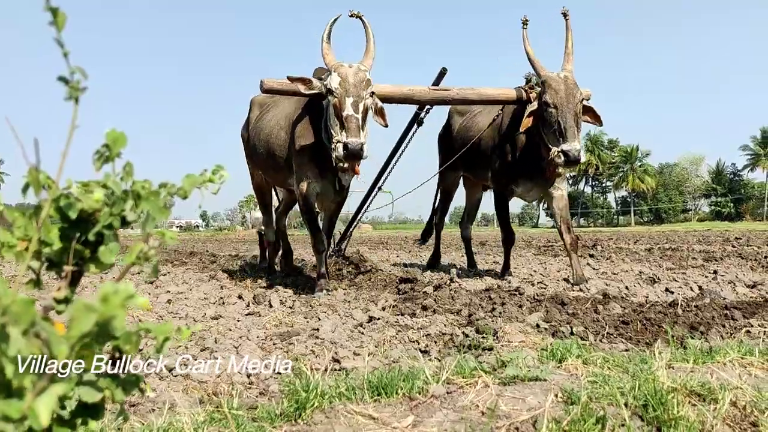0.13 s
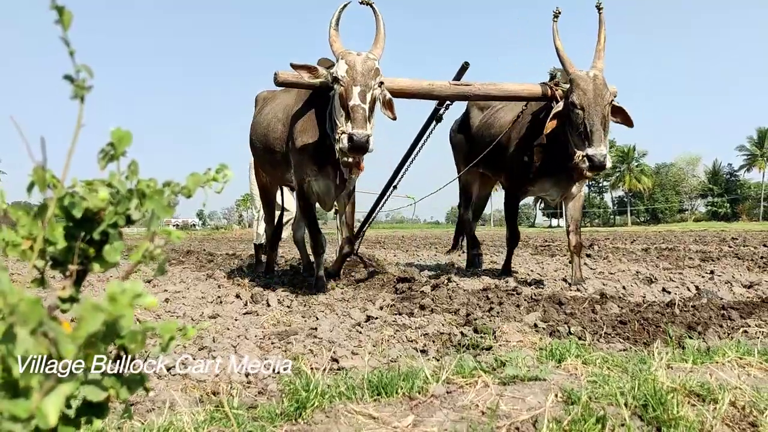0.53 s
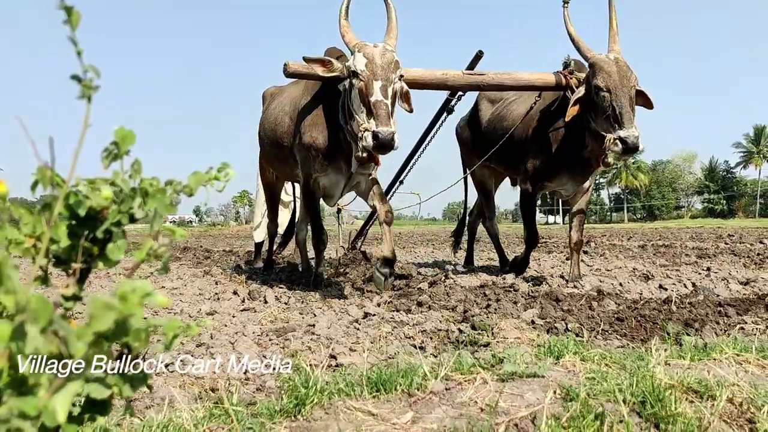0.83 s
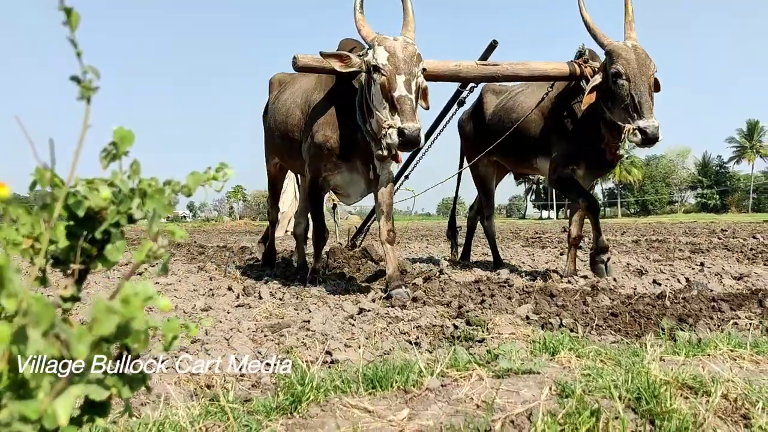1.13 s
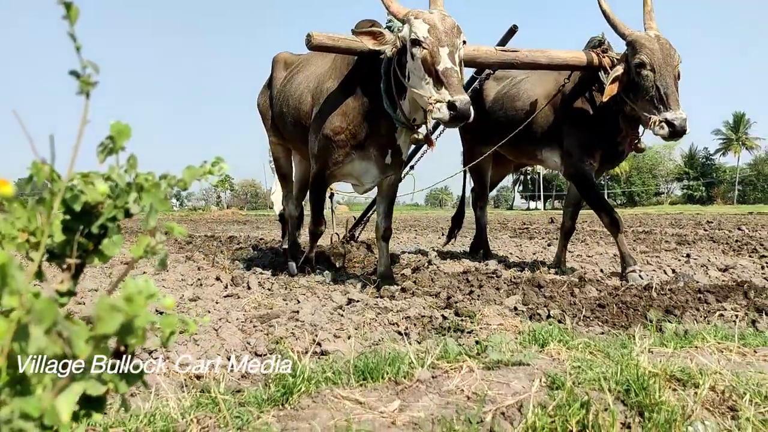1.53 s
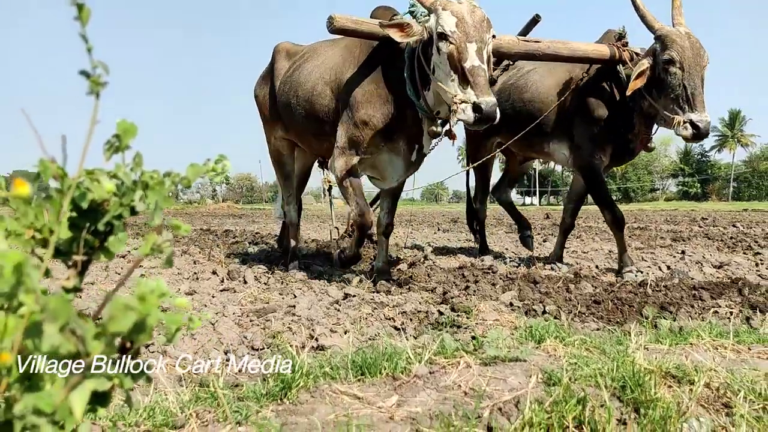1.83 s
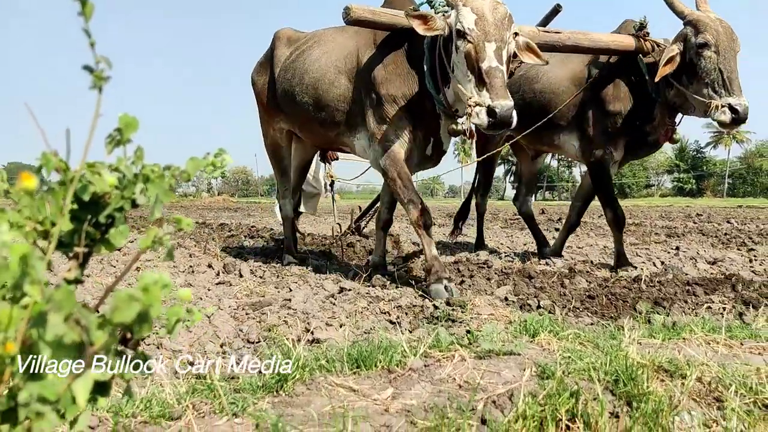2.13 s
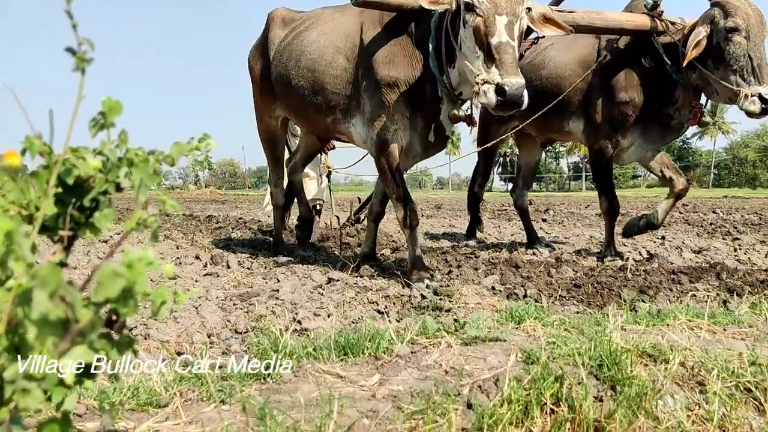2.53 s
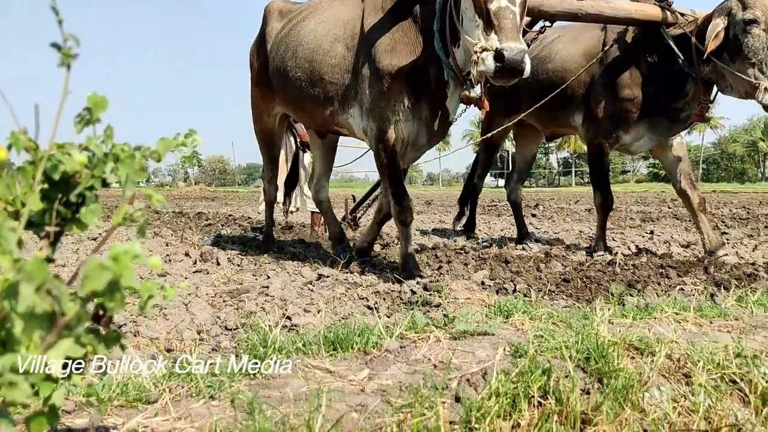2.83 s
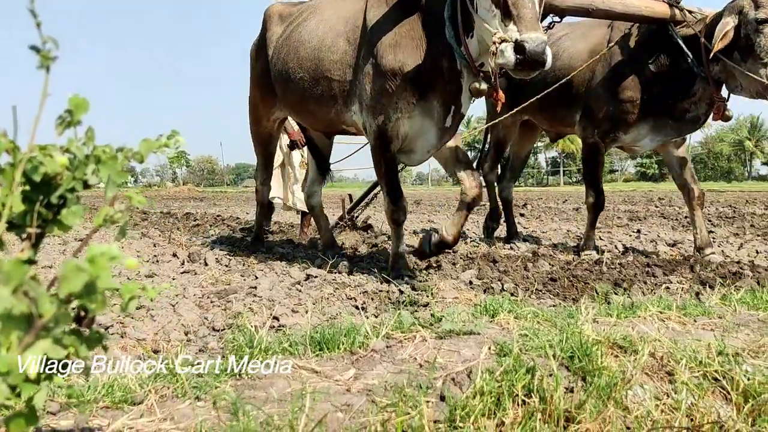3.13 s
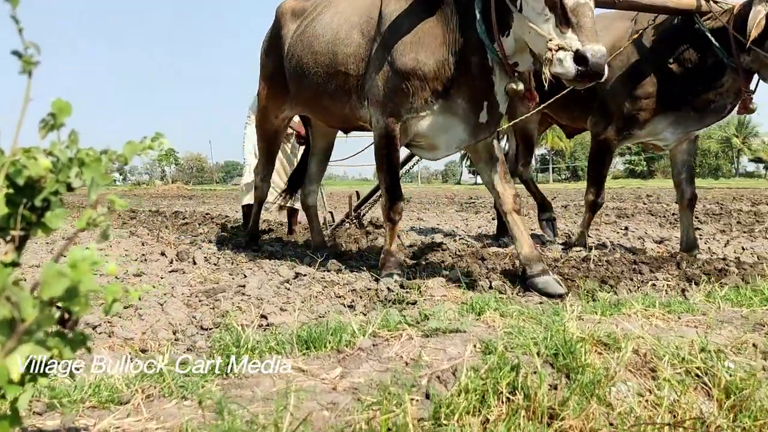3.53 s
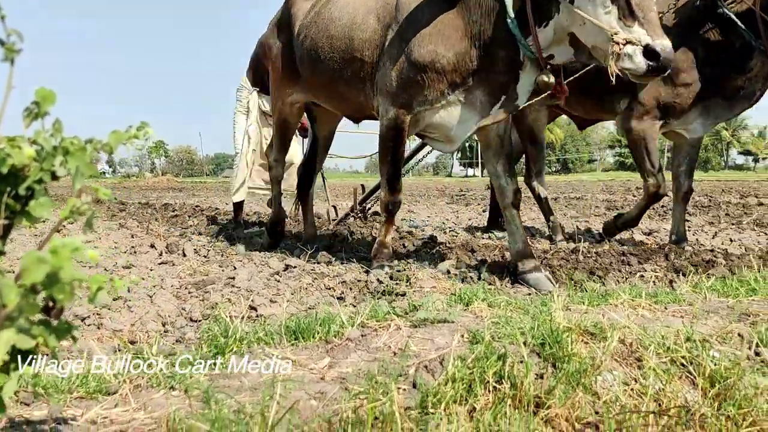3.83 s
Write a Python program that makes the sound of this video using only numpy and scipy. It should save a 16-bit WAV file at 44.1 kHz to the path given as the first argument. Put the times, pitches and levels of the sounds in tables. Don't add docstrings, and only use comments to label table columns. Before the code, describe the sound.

Two oxen drag a plough through crumbling soil under low wind rumble, with faint bird whistles

```python
import sys
import numpy as np
from scipy import signal
from scipy.fft import rfft, irfft, next_fast_len
from scipy.io import wavfile
from scipy.ndimage import uniform_filter1d, map_coordinates

SR = 44100
rng = np.random.default_rng(int(sys.argv[2]) if len(sys.argv) > 2 else 0)


def invert_db(level):
    return 10 ** (np.asarray(level, dtype=float) / 20)


def wrap_up_sound(samples):
    columns = np.atleast_2d(samples).T
    tamed = np.clip(columns, -1, 1)
    steps = np.round(tamed * 32767).astype(np.int16)
    wavfile.write(sys.argv[1], SR, steps)


N = 176400


def unit(x):
    return x / np.sqrt(np.mean(x ** 2) + 1e-20)


def along(points, hz):
    f, v = np.transpose(points)
    return np.interp(np.log(hz + 1), np.log(f + 1), v)


def curve(rows):
    return np.interp(np.arange(N) / SR, *np.transpose(rows))


def wobble(rate):
    knots = rng.standard_normal(int(N * rate / SR) + 4)
    return map_coordinates(knots, [np.arange(N) * rate / SR])


def filtered(x, response):
    m = next_fast_len(x.shape[-1] + 8192)
    spectrum = rfft(x, m) * response(np.fft.rfftfreq(m, 1 / SR))
    return irfft(spectrum, m)[..., :x.shape[-1]]


def add(track, s, x):
    i = round(s * SR)
    part = track[..., max(i, 0):max(i + x.shape[-1], 0)]
    part += x[..., max(-i, 0):][..., :part.shape[-1]]


def glide(pitch_hz):
    return np.sin(2 * np.pi * np.cumsum(pitch_hz) / SR)


def pair(source, spectrum):
    # frequency_hz, correlation
    likeness = [(250, 1), (600, 0.81), (1500, -0.22), (8000, -0.048)]

    def mid_side(hz):
        turn = np.arccos(np.clip(along(likeness, hz), -1, 1)) / 2
        return invert_db(along(spectrum, hz)) * [np.cos(turn), np.sin(turn)]

    mid, side = filtered(source, mid_side)
    return unit(np.array([mid + side, mid - side]))


def wind():
    # time_s, level_db
    breeze = [(0, -37.5), (.6, -39), (.8, -39), (1.2, -38), (1.45, -46.5), (1.68, -50.5), (1.74, -37.5),
              (2.4, -40.5), (2.8, -41.5), (3.1, -37), (3.35, -37), (3.6, -38.5), (4, -38.5)]
    # frequency_hz, density_db
    rumble = [(12, -25), (20, 20), (71, 13.5), (184, -12), (300, -19.5), (600, -42.5)]
    # time_s, level_db, half_width_s, top_hz (if it flutters)
    gusts = [
        [(.04, -30, .04), (.465, -31, .026, 160), (.612, -40, .013), (1.18, -30, .04), (2.03, -30, .02),
         (2.085, -25, .025), (2.96, -27, .03), (3.02, -20, .035), (3.55, -33, .06), (3.74, -26, .06),
         (3.99, -30, .02)],
        [(.21, -34, .04), (.56, -32, .06), (2.48, -34, .025), (3.63, -30, .04)],
    ]
    # time_s, level_db, half_width_s, rate_hz
    shedding = (.449, -25, .016, 105)
    # time_s, peak_db, half_width_s (sign: push or pull first)
    eddies = [(.497, -15, -.008), (.4905, -20, -.002), (.6145, -18, .0045), (1.0555, -13, .003),
              (1.096, -18, .0032), (1.138, -11.5, -.0025)]
    usual_top_hz, fall_db_per_octave = 60.2, 23.5

    slow = np.array([wobble(9.04), wobble(9.156)])
    quick = np.array([wobble(30.09), wobble(29.7)])
    lumpy = invert_db(4.17 * slow + 2.2 * quick) * rng.standard_normal((2, N))
    out = invert_db(curve(breeze)) * unit(filtered(lumpy, lambda hz: invert_db(along(rumble, hz))))

    t = np.arange(-SR // 4, SR // 4) / SR
    for port, rows in enumerate(gusts):
        for s, db, width, *top in rows:
            top_hz = top[0] if top else usual_top_hz

            def colour(hz):
                fall_db = fall_db_per_octave / 2 * np.log2(1 + (hz / top_hz) ** 2)
                return (hz > 18) * invert_db(-fall_db)

            gust = filtered(rng.standard_normal(len(t)), colour) * np.exp(-(t / width) ** 2 / 2)
            add(out[port], s + t[0], invert_db(db) * unit(gust) * np.sqrt(4.03 * width))

    s, db, width, hz = shedding
    train = np.cos(2 * np.pi * hz * t) * np.exp(-(t / width) ** 4 / 2)
    add(out[0], s + t[0], invert_db(db) * train)
    for s, db, width in eddies:
        add(out[0], s + t[0], invert_db(db) * t / width * np.exp(-(t / width) ** 2 / 2))
    return out * np.minimum(np.arange(N) / SR / 0.0031, 1)


def soil():
    # time_s, level_db
    effort = [(0, -1), (.43, -2.5), (.8, -4), (1.2, 1), (1.712, -1), (1.735, 9.5), (1.93, 8.5), (2.02, 2),
              (2.5, 0.5), (2.8, -6.5), (3.12, 3), (3.4, -6.5), (3.7, 1.5), (4, 3.5)]
    # frequency_hz, density_db
    crumble = [(200, -19.5), (600, -4.5), (1250, -3.5), (3000, -4), (4700, -8), (7000, -4), (8800, -13),
               (15500, -15.5)]
    grains_per_s, spread_db, top_db = 5000, 3, 13
    hit, size, sign = rng.random((3, 2, N))
    strength = invert_db(np.minimum(-spread_db * np.log(size), top_db))
    grains = (hit < grains_per_s / SR) * strength * np.sign(sign - .5)
    level_db = -62.5 + curve(effort) + 2 * wobble(55)
    lean_right_db = np.array([[-1.5], [1.5]])
    return invert_db(level_db + lean_right_db) * pair(grains, crumble)


def puffs(rows):
    out, t = np.zeros((2, N)), np.arange(SR // 8) / SR
    for s, db, hz, *width in rows:
        octaves = width[0] if width else 1.35
        t60_s = 0.043 * (1000 / hz) ** 0.27
        crack = 8 * (np.arange(len(t)) == SR // 1000)
        source = rng.standard_normal(len(t)) + crack
        puff = unit(filtered(source, lambda f: np.exp(-(np.log2((f + 1) / hz) / octaves) ** 2)))
        fade = invert_db(db - 7.0 - 60 * t / t60_s + [[-.7], [.7]])
        add(out, s, fade * puff * (1 - np.exp(-t / 0.001)))
    return out


def clods():
    # start_s, peak_db, centre_hz, width_octaves (if unusual)
    breaks = [(.047, -60, 3500), (0.191, -50.5, 1500), (.269, -50, 8000), (.373, -49.5, 1490),
              (0.404, -40.5, 2000), (0.588, -48, 7950), (.966, -47, 280, .7), (1.0363, -47, 9000),
              (1.324, -43, 3270), (1.354, -37, 360, .6), (1.743, -39.5, 494), (1.787, -41.5, 547),
              (1.813, -39, 790), (1.862, -36.5, 4600, .7), (1.8736, -37, 7400), (1.891, -40.5, 905),
              (1.902, -43.5, 7100), (1.921, -44, 10000), (2.413, -45, 6300, .4), (2.413, -48, 12500, .3),
              (2.6284, -43.5, 5400, .6), (3.0578, -49, 7000), (3.159, -41, 1900), (3.8527, -46, 7200, .2),
              (3.9484, -45, 4000), (3.996, -37.5, 504)]
    return puffs(breaks)


def pebbles():
    # start_s, peak_db, centre_hz, width_octaves
    snaps = [(.047, -46, 2500, 2), (.485, -40.5, 338, 0.25), (.612, -51, 345, 0.16), (.645, -52, 350, .15),
             (.966, -49, 1200, 1.5), (1.3915, -46.5, 3230, .12), (1.7278, -52, 6100, 0.33),
             (1.7408, -45.5, 3980, .6), (1.84, -47, 1900, .3), (1.879, -36, 7200, 0.27),
             (1.88, -46, 2500, .3), (1.905, -47.5, 1900, .4), (1.935, -50, 4000, 0.94),
             (1.9914, -48, 8800, .25), (2.1011, -48, 7800, .6), (2.2468, -48, 7000, 0.72),
             (2.353, -49, 6800, 0.28), (2.427, -43, 6300, .5), (2.4902, -51, 7300, .2),
             (2.492, -50.5, 1000, 0.88), (2.737, -53, 4600, .3), (3.1597, -48, 9000, 1.2),
             (.075, -47, 700, 1.5), (1.511, -50, 1500, .8), (1.588, -50, 1200, 1), (1.755, -43, 500, .6),
             (3.585, -51, 6500, .4), (3.75, -50, 6000, .4), (3.852, -51, 5000, .2), (.2205, -48, 5200, .4),
             (.279, -49, 7500, .4), (.416, -47, 6800, .6), (.433, -49, 6000, .5), (1.862, -44, 1900, .4)]
    return puffs(snaps)


def bell():
    # start_s, peak_db, pitch_hz
    strokes = [(0.2214, -42.5, 6120), (0.28, -51.5, 6000), (0.416, -44.5, 5880), (0.607, -50, 5970),
               (0.637, -51.5, 5920), (0.9856, -53.5, 5970), (1.057, -53, 5800), (2.5138, -38.5, 5800),
               (2.5292, -43, 5920), (2.563, -48, 5780), (2.589, -52.5, 5770), (3.2585, -54.5, 5980),
               (3.749, -56, 5900), (3.7942, -49, 6060), (3.9594, -53, 5950), (3.97, -35.5, 5830)]
    # pitch_ratio, level_db
    side_modes = [
        (1.12, -11),
        (.92, -19),
    ]
    out, t = np.zeros(N), np.arange(SR // 5) / SR
    for s, db, hz in strokes:
        t60_s = .036 * invert_db(.35 * (db + 40.5))
        ring = np.sin(2 * np.pi * hz * t) * invert_db(-60 * t / t60_s)
        for ratio, side_db in side_modes:
            fade = invert_db(side_db + rng.normal(0, 3) - 60 * t / .022)
            ring = ring + fade * np.sin(2 * np.pi * hz * ratio * t)
        attack = 1 - np.exp(-t / .0004)
        add(out, s - .001, invert_db(db + 3.0) * ring * attack)
    return out


def timber(rows, body, slips_per_s):
    out, n, count = np.zeros(N), SR // 6, np.arange(16)
    loss_hz = 35
    for s, db, length, ratio in rows:
        rate = slips_per_s * ratio
        gap, size = rng.standard_normal((2, 16))
        at = (count + .05 * gap * (count > 0)) / rate
        strength = invert_db(2 * size - .6 * count) * np.clip((length - at) * rate + 1, 0, 1)
        slips = np.bincount(np.round(at * SR).astype(int), strength, n)[:n]

        def resonances(f):
            total = 0
            for k, (centre, width, mode_db) in enumerate(body):
                damping = 1j * f * (width + loss_hz)
                total = total + (-1) ** k * invert_db(mode_db) * damping / ((centre * ratio) ** 2 - f * f + damping)
            return total

        ring = filtered(slips, resonances)
        add(out, s, invert_db(db) * ring / np.abs(ring).max())
    return out


def yoke():
    # start_s, level_db, length_s, pitch_ratio
    creaks = [(.477, -54, .004, 1.04), (.609, -51, .016, 1.05), (1.236, -56, .028, 1), (1.322, -43, .01, 1),
              (1.339, -46, .012, 1), (1.368, -42.5, .005, 1), (2.064, -54, .013, 1),
              (2.119, -54, .016, 1.02), (3.877, -45.5, .011, 1.12)]
    knock = [(2.684, -36.5, 0.0138, 0.92)]
    # centre_hz, width_hz, level_db
    yoke_modes = [(690, 70, -8), (902, 10, 0), (1300, 15, -5), (1536, 15, -14), (3080, 40, -13),
                  (3720, 60, -16), (4600, 60, -18)]
    beam_modes = [(694, 48, 0.5), (990, 190, -7), (1210, 53, -1), (1520, 100, -3), (1956, 78, -3.5)]
    return timber(creaks, yoke_modes, 451) + timber(knock, beam_modes, 225)


def bird(shape, calls):
    out, (at, hz, db) = np.zeros(N), np.transpose(shape)
    for s, call_db, *change in calls:
        ratio, tail, fall = change or (1, 1, 1)
        when = at * np.where(at < 0, fall, tail)
        t = np.arange(when[0], when[-1], 1 / SR)
        pitch = uniform_filter1d(np.interp(t, when, hz * ratio), size=150, mode="nearest")
        add(out, s + t[0], invert_db(call_db + 2 + np.interp(t, when, db)) * glide(pitch))
    return out * invert_db(2.2 * wobble(60))


def far_notes():
    # start_s, length_s, from_hz, to_hz, level_db
    notes_far = [(1.154, 0.037, 2215, 2030, -62), (1.201, 0.011, 3390, 3150, -62),
                 (1.213, 0.02, 2650, 2100, -65), (1.386, 0.069, 2280, 2790, -68),
                 (2.977, 0.074, 2380, 2350, -67), (3.147, 0.031, 3810, 3480, -66),
                 (3.175, 0.043, 3450, 3300, -62.5), (3.198, 0.013, 2240, 2150, -57),
                 (3.495, .035, 2200, 2250, -65), (3.755, .028, 1500, 1480, -63),
                 (3.97, .03, 2700, 2600, -65)]
    out = np.zeros(N)
    for s, length, from_hz, to_hz, db in notes_far:
        n = int(length * SR)
        add(out, s, invert_db(db + 1.5) * np.sqrt(np.hanning(n)) * glide(np.linspace(from_hz, to_hz, n)))
    return out


def birds():
    # time_from_knee_s, pitch_hz, level_db
    whistle_shape = [(-.08, 4250, -17), (-.052, 3720, -8), (-.041, 3600, -22), (-.028, 3400, -7),
                     (-.006, 2950, 0), (.007, 2380, 1), (.04, 2180, -1), (.092, 2130, -4),
                     (.102, 2100, -30)]
    cheep_shape = [(-.06, 3900, -20), (-.035, 3880, -8), (-.022, 3850, -6), (-.014, 3500, -14),
                   (0, 3200, 0), (.012, 2650, -16)]
    seep_shape = [(-.05, 6920, -14), (-.018, 6270, -6), (0, 6030, 2.5), (.025, 6180, 0.5), (.052, 6220, -1),
                  (.058, 6200, -19)]
    # knee_s, level_db, then if varied pitch_ratio, tail_stretch, fall_stretch
    whistle_calls = [(2.613, -58, 1.04, 1, .68), (2.885, -63, 1.075, .9, .42), (3.098, -53.5, 1, 1, 1),
                     (3.33, -59.5, 1.035, 1.06, .64)]
    cheep_calls = [(1.604, -61.5), (1.795, -56), (1.988, -58.5), (2.182, -57.5), (2.437, -57), (2.64, -61),
                   (2.854, -63.5), (3.102, -66)]
    seep_calls = [(1.835, -66, 1.01, .7, .5), (2.7, -64, 1, 1, .85), (2.92, -66, .918, .8, 1.2)]
    song = bird(whistle_shape, whistle_calls) + bird(cheep_shape, cheep_calls)
    return song + bird(seep_shape, seep_calls) + far_notes()


def echo(x):
    t = np.arange(SR // 2) / SR
    tail = rng.standard_normal((2, len(t))) * invert_db(-60 * t / 0.33)
    return signal.fftconvolve(x[None], tail / np.linalg.norm(tail[0]), axes=1)[:, :N]


def fields():
    # frequency_hz, density_db
    hush = [(130, -28), (220, -9.5), (400, -9.5), (958, -10.5), (2500, -7), (4600, -14.5), (6600, -12.5),
            (15500, -23)]
    level_db = -62.5 + 0.16 * wobble(3.02) + 1.42 * wobble(14)
    return invert_db(level_db) * pair(rng.standard_normal((2, N)), hush)


def scene():
    wood, chime, lumps, song = yoke(), bell(), clods(), birds()
    near = wood * invert_db([[.4], [-.4]]) + chime * invert_db([[1.2], [-1.2]])
    near = near + lumps + song * invert_db([[-.6], [.6]])
    ground = wood + chime + lumps.mean(axis=0)
    wet = echo(invert_db(-13.5) * ground + invert_db(-7) * song)
    return near + wet + wind() + fields() + soil() + pebbles()


def low_pass(x):
    return signal.sosfilt(signal.butter(12, 15690, fs=SR, output="sos"), x)


def record(dry):
    mix = filtered(dry, lambda hz: hz < 15700)
    return low_pass(mix)


dry = scene()
out = record(dry)
wrap_up_sound(out)
```